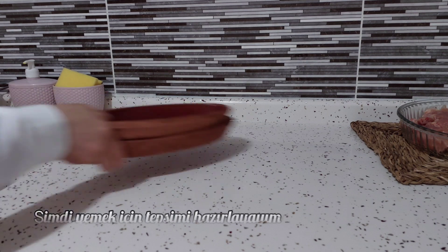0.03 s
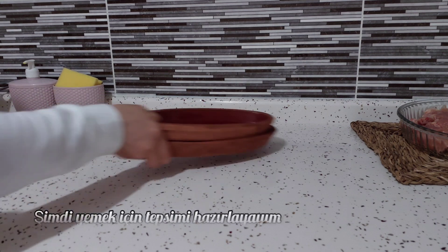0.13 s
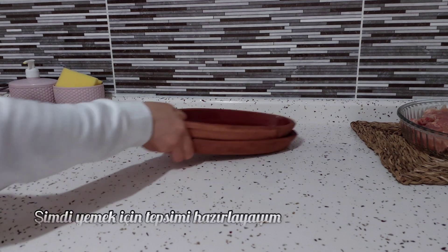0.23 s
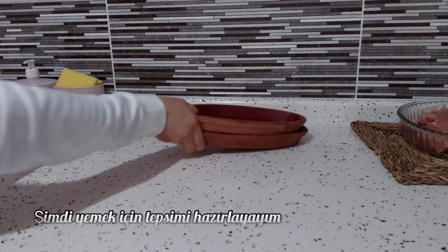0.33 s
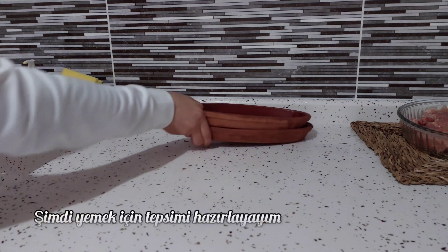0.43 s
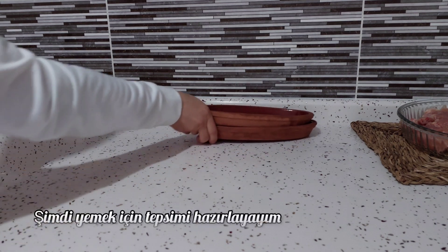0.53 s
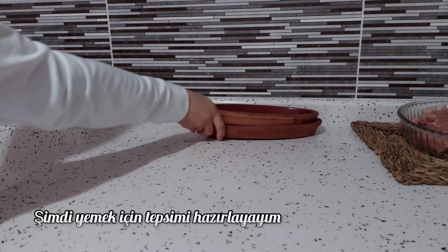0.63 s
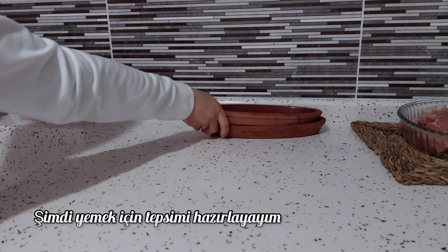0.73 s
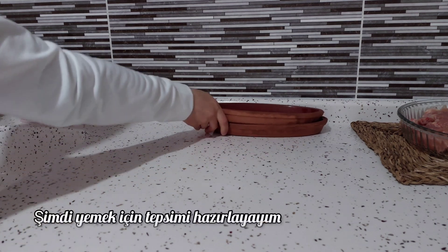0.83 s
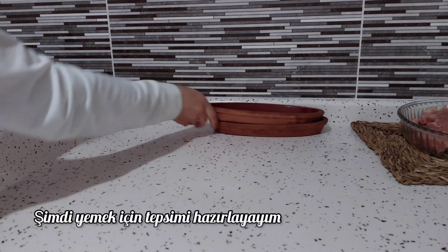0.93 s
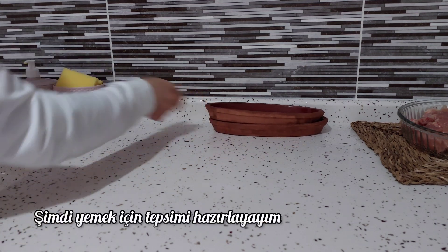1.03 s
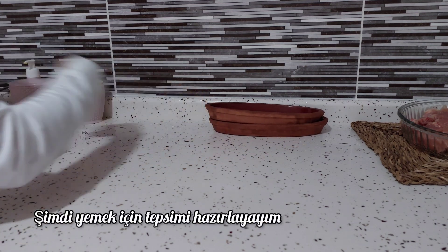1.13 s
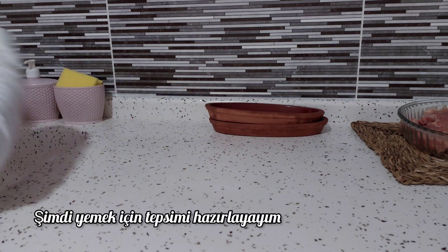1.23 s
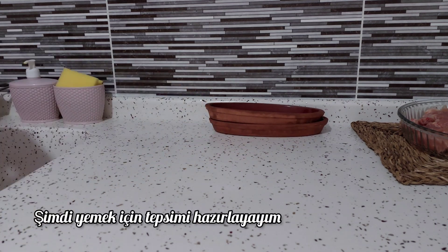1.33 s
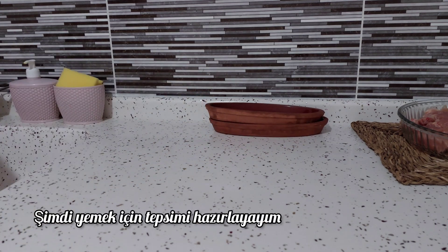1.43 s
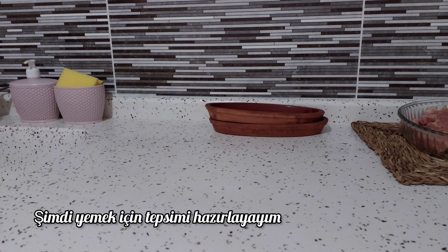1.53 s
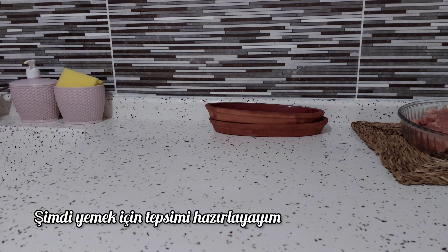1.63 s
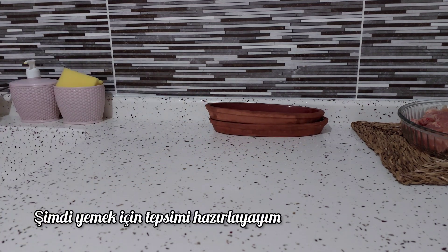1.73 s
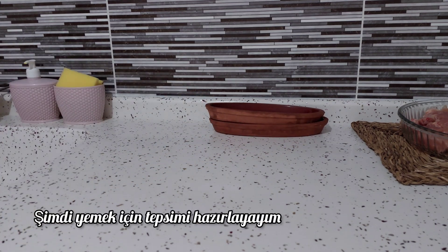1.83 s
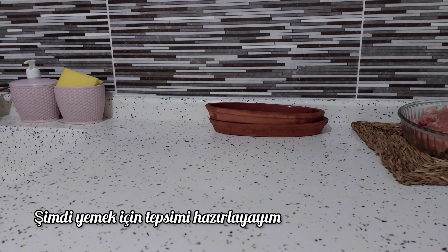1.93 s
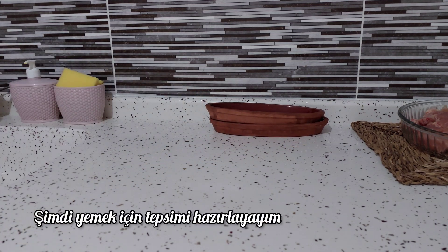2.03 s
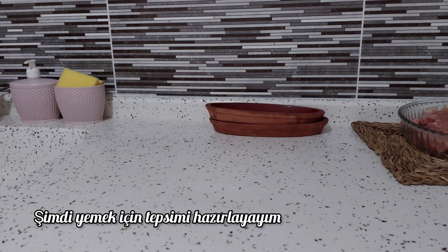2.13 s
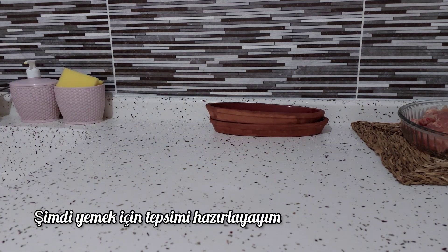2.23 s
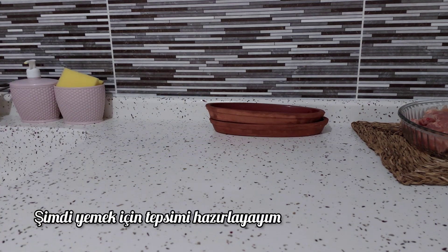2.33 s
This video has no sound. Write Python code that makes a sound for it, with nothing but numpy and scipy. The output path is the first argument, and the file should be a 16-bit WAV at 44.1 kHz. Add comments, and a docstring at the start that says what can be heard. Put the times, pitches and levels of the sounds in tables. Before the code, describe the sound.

Two stacked clay dishes land on a stone countertop with a hard knock, rock once, then settle with a quick double clack; close microphone, short ringing tiled kitchen, low appliance hum, faint slide at the end.

```python
"""A tiled kitchen: two nested clay dishes are lowered onto a stone countertop over a low appliance hum.
One edge lands, the stack rocks, then settles with a double clack; the hard room rings on.
Later something, probably a drawer, slides faintly nearby.
Dishes and counter are damped modes plus noise bursts, the room a decaying noise tail with standing waves,
the slide and the air shaped noise, the hum steady sines."""
import sys
import numpy as np
from scipy import signal
from scipy.fft import rfft, irfft, next_fast_len
from scipy.io import wavfile

SR = 44100
rng = np.random.default_rng(int(sys.argv[2]) if len(sys.argv) > 2 else 0)


def transcribe(signal):
    """Save signal, clipped to [-1, 1], as a 16-bit WAV file at the path in sys.argv[1]."""
    frames = np.atleast_2d(signal).T
    limited = np.clip(frames, -1, 1)
    pcm = np.round(limited * 32767).astype(np.int16)
    wavfile.write(sys.argv[1], SR, pcm)


N = 105840
TOP_HZ = 15800  # band limit


def amp(db):
    """Decibels to amplitude."""
    return 10 ** (np.asarray(db) / 20)


def unit(x):
    """Scaled to rms 1."""
    return x / np.sqrt(np.mean(x ** 2) + 1e-20)


def decay(t, t60_s):
    """Exponential fall of 60 dB in t60_s."""
    return np.exp(-np.log(1000) * t / t60_s)


def along(points, hz):
    """Interpolates (frequency, value) points on a log frequency axis."""
    point_hz, value = np.transpose(points)
    return np.interp(np.log(hz + 1), np.log(point_hz + 1), value)


def filtered(x, response):
    """x times a zero-phase response of frequency, padded against wrap-around."""
    n = x.shape[-1]
    size = next_fast_len(n + SR // 2)
    hz = np.fft.rfftfreq(size, 1 / SR)
    return irfft(rfft(x, size) * response(hz), size)[..., :n]


def causal(spectrum, size=8192):
    """Minimum-phase pulse of energy 1 with this spectrum, by folding the cepstrum."""
    hz = np.fft.rfftfreq(size, 1 / SR)
    cepstrum = irfft(np.log(amp(along(spectrum, hz))))
    cepstrum[1:size // 2] *= 2
    cepstrum[size // 2 + 1:] = 0
    pulse = irfft(np.exp(rfft(cepstrum)))
    return pulse / np.linalg.norm(pulse)


def stereo(pair, spectrum):
    """Two unrelated signals become a coloured left and right, alike in the bass."""
    # left-right correlation: freq_hz, likeness (0 to 1)
    likeness = [(60, 1), (150, .92), (380, .72), (950, 0.095), (2400, 0.18), (6000, 0.018)]

    def mid_side(hz):
        angle = np.arccos(np.clip(along(likeness, hz), -1, 1)) / 2
        return amp(along(spectrum, hz)) * np.array([np.cos(angle), np.sin(angle)])

    mid, side = filtered(pair, mid_side)
    return np.array([mid + side, mid - side])


def ring(modes, t):
    """Damped modes of alternating sign, their levels scattered at random on every call."""
    scatter_db = 2.16
    out = np.zeros(len(t))
    for k, (hz, db, t60_s) in enumerate(modes):
        mode = np.sin(2 * np.pi * hz * t) * decay(t, t60_s)
        gain = amp(db + scatter_db * rng.standard_normal())
        out += (-1) ** k * gain * mode / np.linalg.norm(mode)
    return out


def burst(spectrum, t60_s, t):
    """Decaying coloured noise of energy 1."""
    noise = rng.standard_normal(len(t)) * decay(t, t60_s)
    x = signal.fftconvolve(noise, causal(spectrum))[:len(t)]
    return x / np.linalg.norm(x)


def background():
    """Low room noise that drifts in level, and the steady sine lines of an appliance."""
    # appliance lines: freq_hz, rms_db
    hum_lines = [(102.3, -87.5), (123.8, -77.5), (199.2, -76), (301.5, -77.5), (463.0, -80.5), (651.4, -98)]
    # room noise colour: freq_hz, relative_db
    air_spectrum = [(25, -24), (50, -7), (80, 3.5), (130, 1), (190, -3), (250, -16), (350, -11), (480, -12),
                    (620, -20.5), (850, -28.5), (1500, -35.5), (3000, -44), (15500, -39.5)]
    # room noise level: time_s, rms_db
    air_level = [(0, -66), (.12, -65), (.25, -59.5), (1.05, -65), (1.3, -70.5), (2.4, -62.5)]
    t = np.arange(N) / SR
    hum = sum(amp(db) * np.sqrt(2) * np.sin(2 * np.pi * (hz * t + rng.random())) for hz, db in hum_lines)
    air = unit(stereo(rng.standard_normal((2, N)), air_spectrum))
    return hum + amp(np.interp(t, *np.transpose(air_level))) * air


def punch(hz, t):
    """The jolt of the whole dish as it is stopped: a few cycles, energy 1."""
    punch_cycles = 1.046  # envelope peaks at half of this
    cycles = t * hz
    x = np.sin(2 * np.pi * cycles) * cycles * np.exp(-2 * cycles / punch_cycles)
    return x / np.linalg.norm(x)


def kitchen(x):
    """The tiled room's answer: a diffuse tail dying at its own rate per band, and a few standing waves."""
    # reverberation: freq_hz, t60_s
    room_t60 = [(60, 0.94), (170, 1), (340, 0.74), (700, 0.58), (1400, 0.44), (2700, 0.4), (5400, .34),
                (8000, 0.36), (14000, .25)]
    # diffuse tail energy: freq_hz, db_over_direct
    room_gain = [(60, 0.5), (200, 2.5), (400, 8), (700, 7), (1400, 0.5), (2500, 1), (5000, 5), (12000, 1.5)]
    # standing waves: freq_hz, relative_db, t60_s
    room_modes = [(151, -12, .7), (319, -3, .65), (502, -8, .55), (633, -6, .5), (689, -7, .5)]
    modes_db, wall_delay_s, build_s = -18, 0.0059, 0.0033

    hz, frame_s, bins = signal.stft(rng.standard_normal((2, SR)), SR, nperseg=256)
    t60_s = along(room_t60, hz)[:, None]
    unit_energy = np.sqrt(2 * np.log(1000) / (t60_s * SR))
    fade = decay(frame_s, t60_s) * unit_energy
    diffuse = signal.istft(bins * fade, SR, nperseg=256)[1][:, :SR]
    tail = stereo(diffuse, room_gain)
    t = np.arange(SR) / SR
    tail = tail + amp(modes_db) * ring(room_modes, t)
    tail = tail * np.clip((t - wall_delay_s) / build_s, 0, 1)
    return signal.fftconvolve(x[None], tail, axes=1)[:, :len(x)]


def dishes():
    """Each contact punches and cracks, rings both dishes, crushes a little grit and thuds the counter."""
    # contacts: start_s, punch_db, punch_hz, lower_dish_db, upper_dish_db, crack_db, grit_db, thud_db,
    # bright_hz (low-pass corner of clay and crack)
    knocks = [(0.2349, -3, 880, -0.5, -22, -7.5, -57.5, -12.5, 1092),
              (0.2372, -3, 1800, -1.5, -10.5, -5.5, -27.5, -17.5, 6500),
              (0.4893, 2, 1600, -8.5, 0, -5.5, -39.5, -13.5, 1450),
              (0.6623, -4.5, 1500, -9, 3, -10.5, -39, -16.5, 3100),
              (0.6754, -1.5, 1500, -5.5, -17, -5.5, -40.5, -11.5, 2200),
              (0.6772, 0.5, 2200, -7.5, -7, 0, -26.5, -22, 5000)]
    # modes of each dish and of the countertop: freq_hz, energy_db, t60_s
    lower_modes = [(807, -0.5, 0.015), (838, -7, .09), (882, -6.5, .06), (985, -3, 0.025),
                   (1230, -7, 0.036), (1871, 4, 0.04), (2080, -7, 0.034), (2710, -11.5, .04),
                   (2870, -12.5, .05), (3194, -12, 0.15), (3630, -16, 0.12), (4390, -29.5, .04),
                   (4940, -24, 0.091), (5850, -25, .04), (7160, -21.5, .03), (7580, -18, .05),
                   (8150, -22.5, .03)]
    upper_modes = [(1198, -7, .1), (1277, -12.5, 0.16), (1348, -6.5, 0.17), (1518.5, -7, .05),
                   (1524, -16, .04), (1947, -4.5, .06), (2276, -6, 0.13), (2543, -5.5, 0.078),
                   (2600, -14.5, 0.014), (3420, -11.5, 0.05), (3724, -15, .05), (5410, -10, 0.02),
                   (7300, -20.5, 0.021), (8840, -33.5, .04), (11900, -25, 0.043)]
    counter_modes = [(72.4, -3, 0.22), (102, -2.5, 0.12), (163, -4.5, 0.093), (201.16, -3.5, 0.13),
                     (294.4, -9.5, 0.48), (322, -4, 0.11), (432, -6, 0.013), (480, -10, 0.048),
                     (636.3, -0.5, 0.13), (638, -2, .08)]
    # burst colours: freq_hz, relative_db
    crack_spectrum = [(100, -8), (350, -6.5), (700, -5.5), (1600, 7.5), (2600, -6), (4000, -4.5),
                      (5800, -8.5), (6600, -24), (7600, -18.5), (8800, -24.5), (12000, -23.5), (16000, -31)]
    grit_spectrum = [(3000, -33), (6500, -15.5), (7500, 2), (8400, -8), (8900, -16), (9550, 1),
                     (10400, -12), (11000, -8.5), (11900, -3.5), (13000, -15.5), (14300, -7),
                     (15800, -15.5)]
    crack_t60_s, grit_t60_s, left_db = 0.04, 0.12, 0.6

    out, t = np.zeros((2, N + SR)), np.arange(SR) / SR
    for start_s, punch_db, punch_hz, lower_db, upper_db, crack_db, grit_db, thud_db, bright_hz in knocks:
        clay = amp(lower_db) * ring(lower_modes, t) + amp(upper_db) * ring(upper_modes, t)
        clay = clay + amp(crack_db) * burst(crack_spectrum, crack_t60_s, t)
        clay = signal.lfilter(*signal.butter(2, min(bright_hz, TOP_HZ), fs=SR), clay)
        grit = amp(grit_db) * burst(grit_spectrum, grit_t60_s, t)
        thud = amp(thud_db) * ring(counter_modes, t)
        knock = clay + grit + thud + amp(punch_db) * punch(punch_hz, t)
        out[:, round(start_s * SR):][:, :SR] += knock + kitchen(knock)
    return out[:, :N] * amp([[left_db], [-left_db]])


def drawer():
    """A faint slide: the box rumbles and scrapes as shaped noise while its runners ring and squeak."""
    # box levels: time_s, rumble_rms_db, scrape_rms_db
    box_level = [(1.66, -82, -105), (1.70, -69.5, -80.5), (1.78, -80, -85), (1.9, -75, -86),
                 (1.928, -50.5, -63.5), (1.947, -49, -53.5), (2.0, -55.5, -60), (2.04, -50, -61.5),
                 (2.12, -56, -66.5), (2.28, -63, -78.5), (2.4, -67, -74.5)]
    # box noise colours: freq_hz, relative_db
    rumble_spectrum = [(18, -56), (30, -30), (59, 1.5), (113, 0.5), (342, -5), (406, -8), (481, -4.5),
                       (900, -23), (1170, -72), (1980, -120)]
    scrape_spectrum = [(400, -10), (700, 2.5), (900, -1), (1120, 2.5), (1400, -4), (1750, -13),
                       (2150, -13.5), (2400, -26.5), (2800, -39.5), (3400, -41), (4000, -33), (4600, -50),
                       (9000, -49), (15000, -70)]
    # runner levels: time_s, ring_rms_db, squeak_rms_db
    runner_level = [(1.925, -100, -110), (1.945, -71, -87), (2.04, -70, -94), (2.09, -78.5, -76),
                    (2.16, -81, -88), (2.225, -70.5, -78), (2.27, -72.5, -87.5), (2.335, -67.5, -91.5),
                    (2.4, -80.5, -93.5)]
    # runner resonances: freq_hz, half_width_hz (at -12 dB), relative_db
    ring_modes = [(1120, 130, -2.5), (2140, 120, -7), (2340, 110, -12.5)]
    squeak_modes = [(3770, 72, -2.5), (4140, 410, -13), (6584, 220, -9), (7956, 260, -15),
                    (9500, 330, -12.5), (12800, 600, -14.5)]
    t = np.arange(N) / SR

    def noise(spectrum):
        return unit(stereo(rng.standard_normal((2, N)), spectrum))

    def rubbed(modes):
        def peaks(f):
            return sum(amp(db) / (1 + ((f - hz) / width) ** 2) ** 2 for hz, width, db in modes)
        return unit(filtered(rng.standard_normal((2, N)), peaks))

    def level(times_s, db):
        return amp(np.interp(t, times_s, db, left=-120))

    box_s, rumble_db, scrape_db = np.transpose(box_level)
    runner_s, ring_db, squeak_db = np.transpose(runner_level)
    box = noise(rumble_spectrum) * level(box_s, rumble_db) + noise(scrape_spectrum) * level(box_s, scrape_db)
    runners = rubbed(ring_modes) * level(runner_s, ring_db)
    runners = runners + rubbed(squeak_modes) * level(runner_s, squeak_db)
    return box + runners


def scene():
    """Room tone, dishes and drawer together."""
    return background() + dishes() + drawer()


def record(dry):
    """The microphone thins the deep bass and keeps nothing above its band limit."""
    low_cut_hz = 46
    thinned = signal.lfilter(*signal.butter(2, low_cut_hz, "high", fs=SR), dry)
    return filtered(thinned, lambda hz: hz < TOP_HZ)


dry = scene()
out = record(dry)
transcribe(out)
```